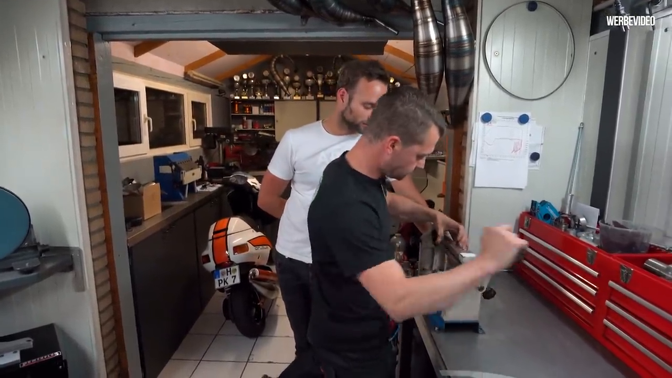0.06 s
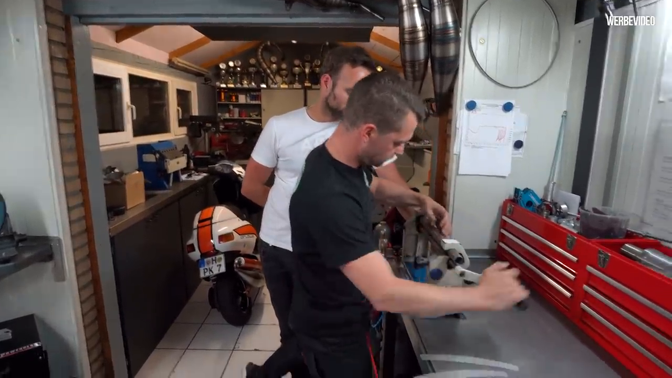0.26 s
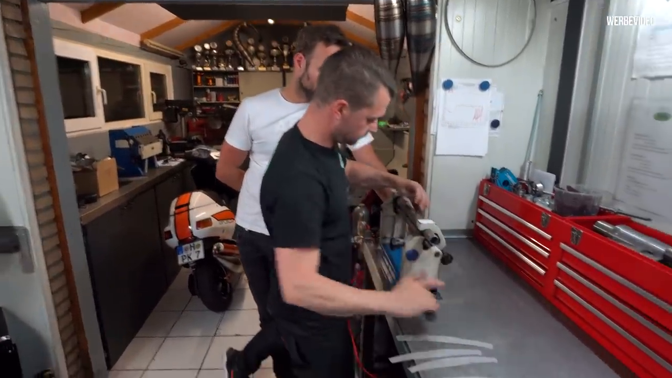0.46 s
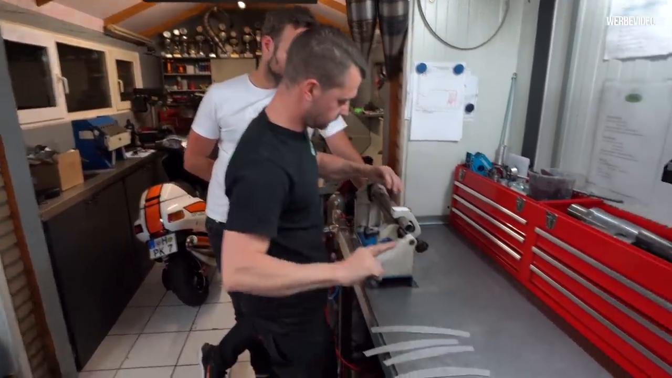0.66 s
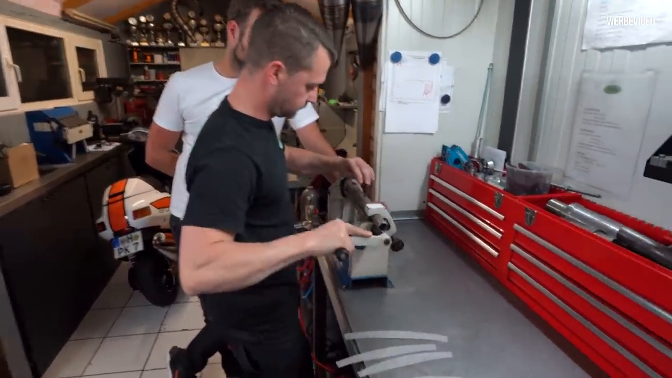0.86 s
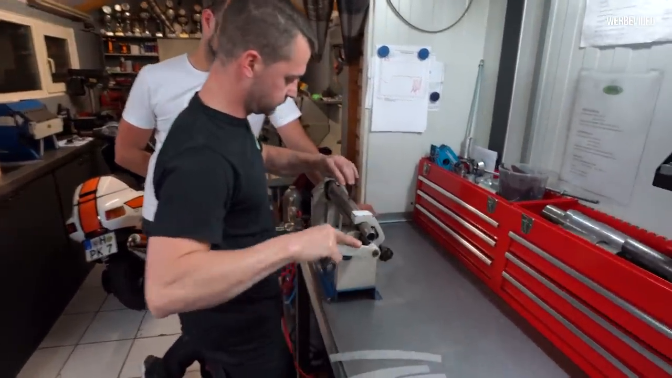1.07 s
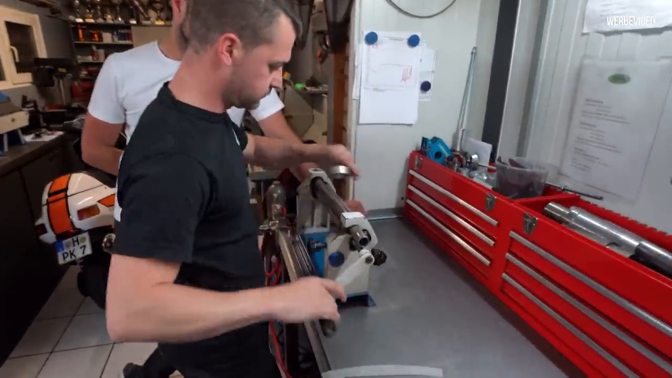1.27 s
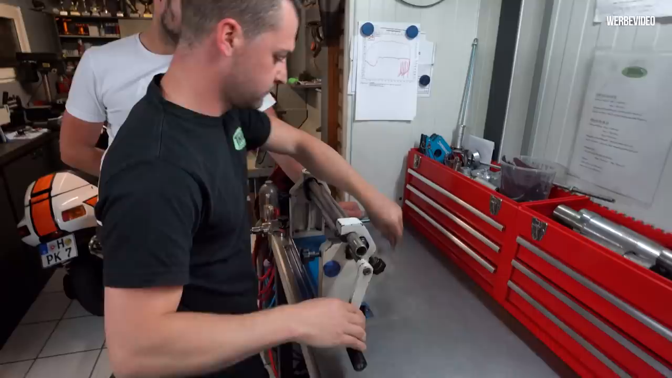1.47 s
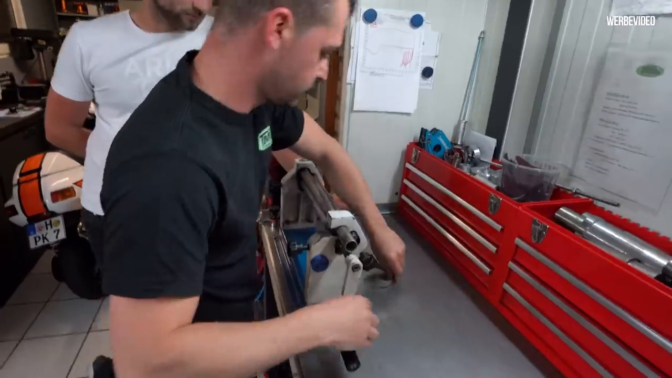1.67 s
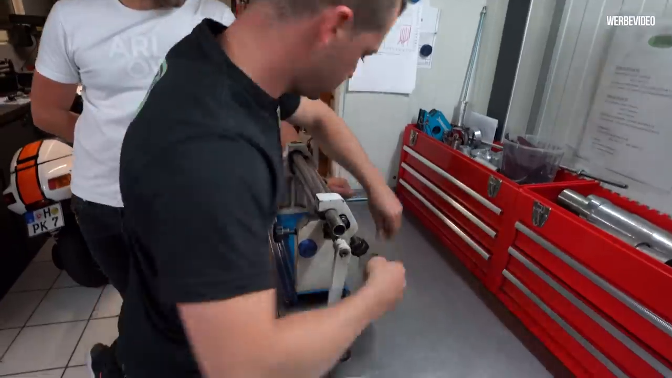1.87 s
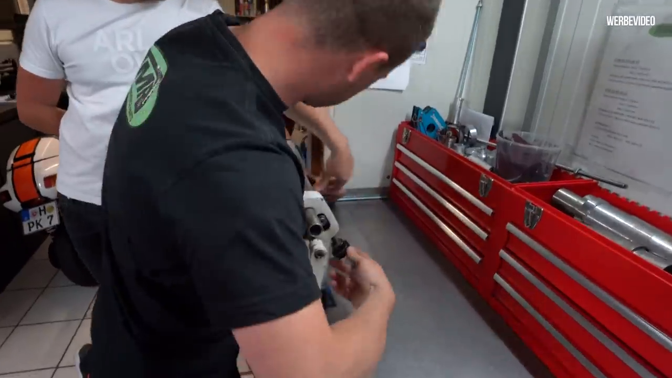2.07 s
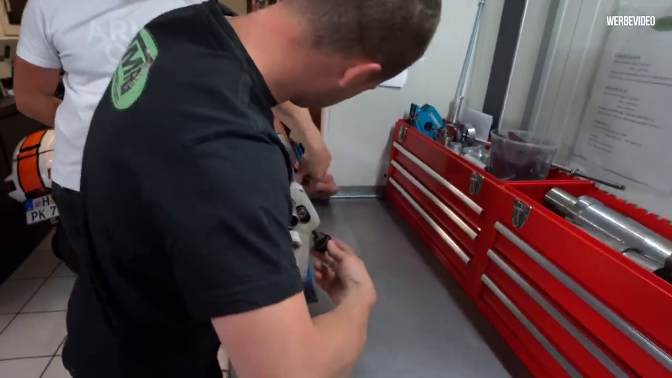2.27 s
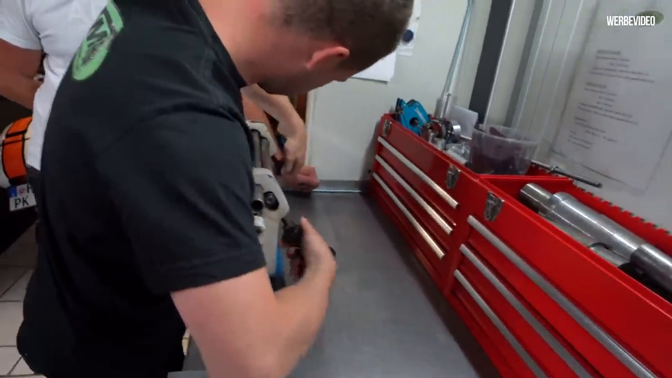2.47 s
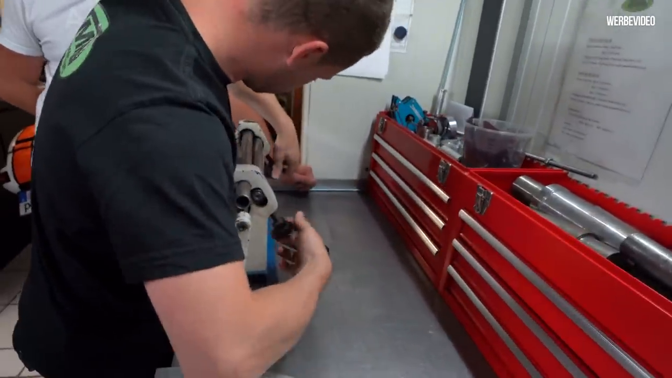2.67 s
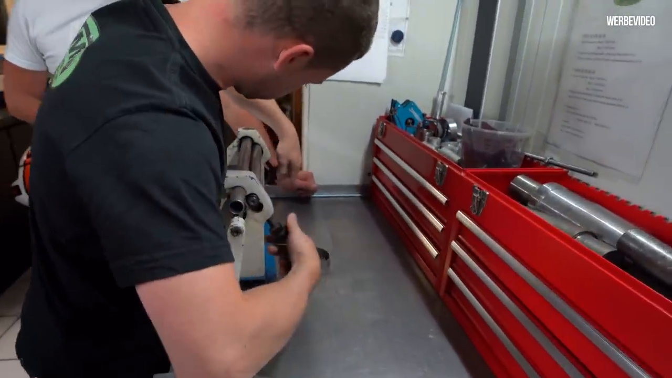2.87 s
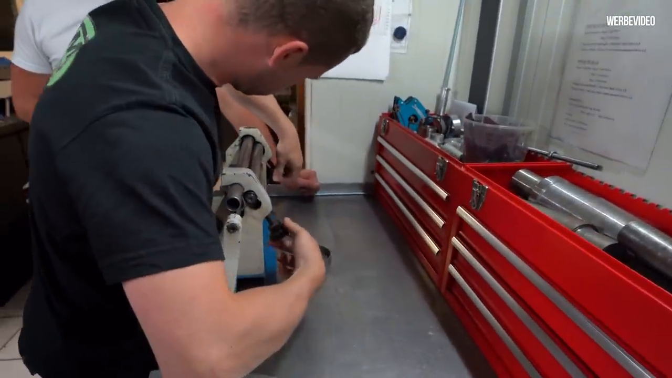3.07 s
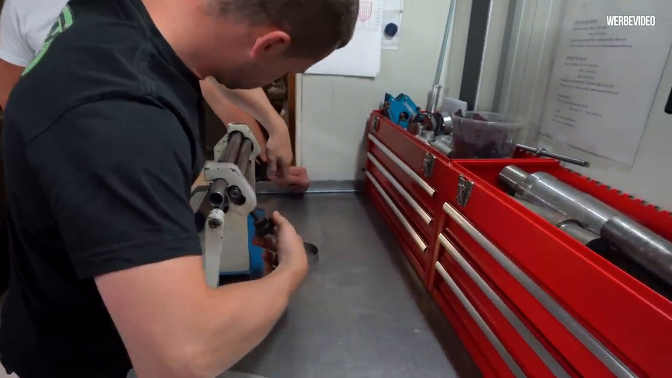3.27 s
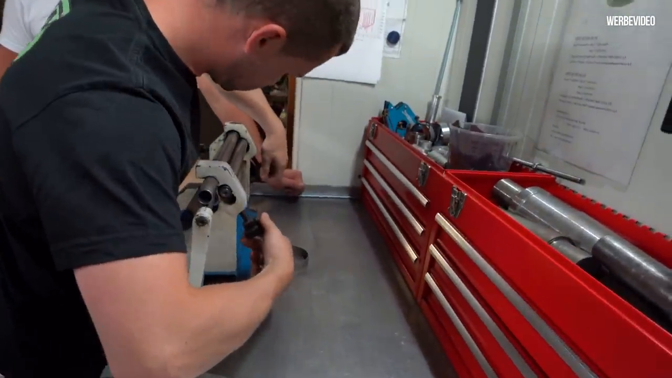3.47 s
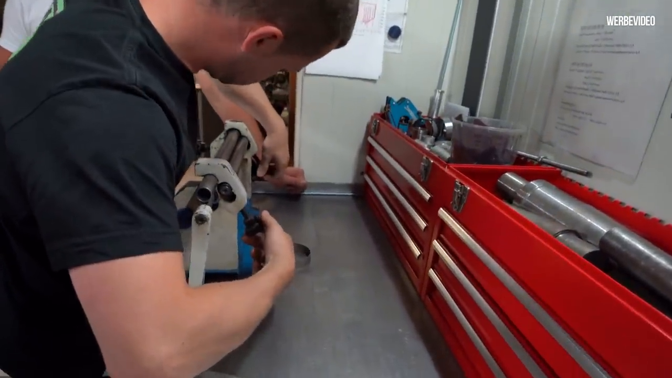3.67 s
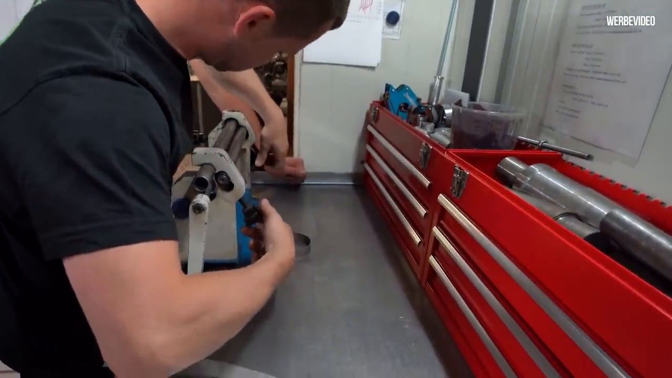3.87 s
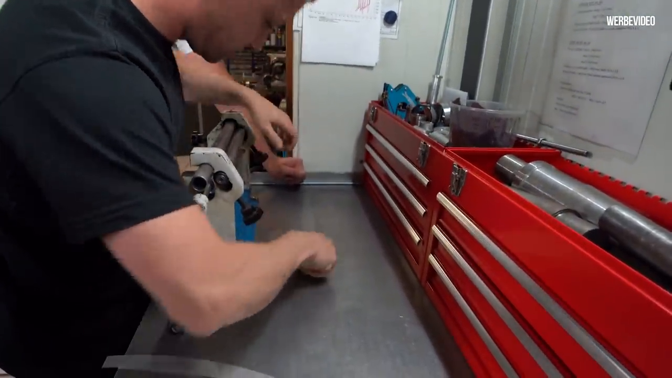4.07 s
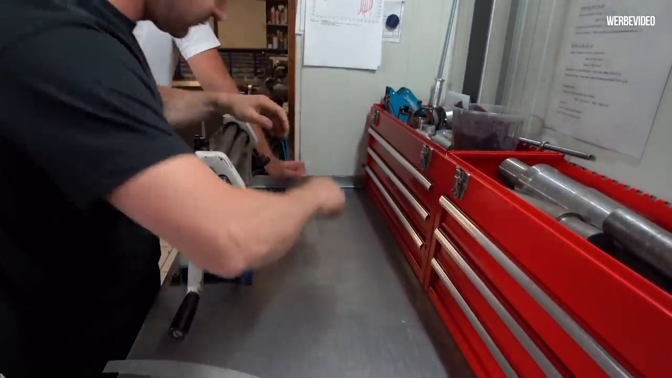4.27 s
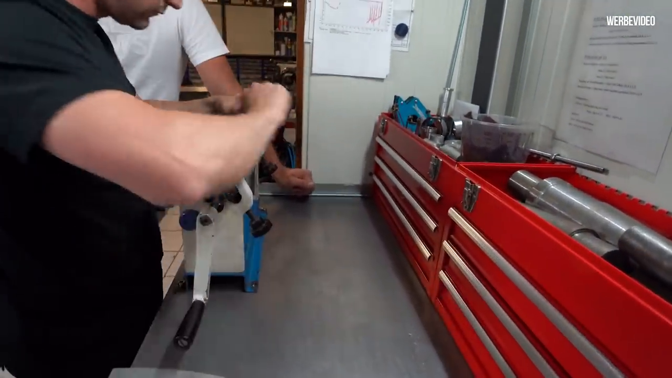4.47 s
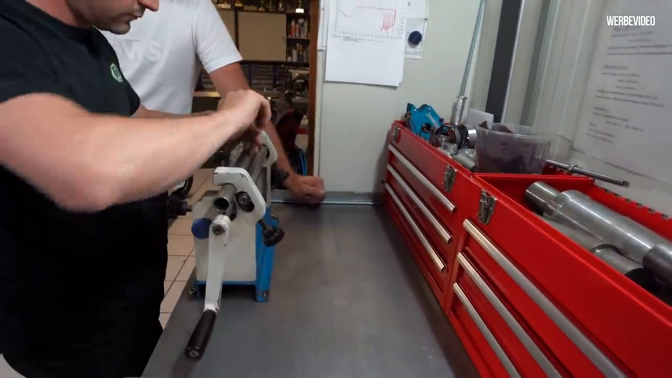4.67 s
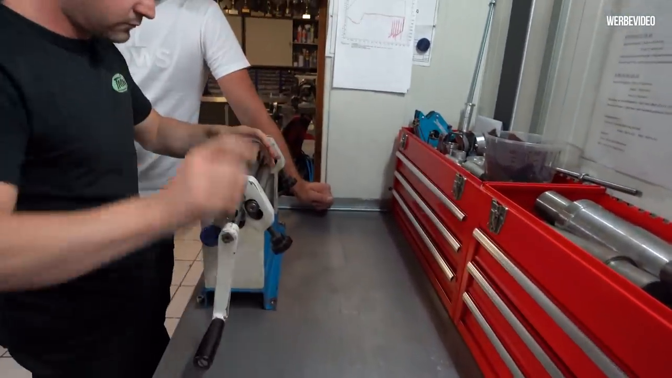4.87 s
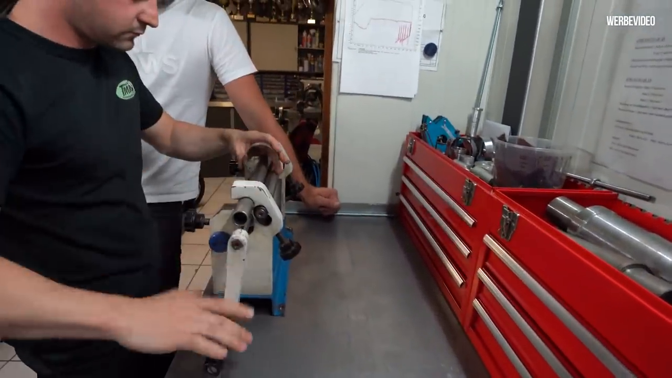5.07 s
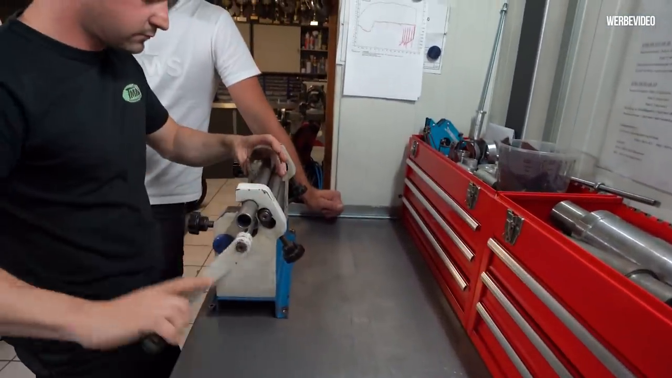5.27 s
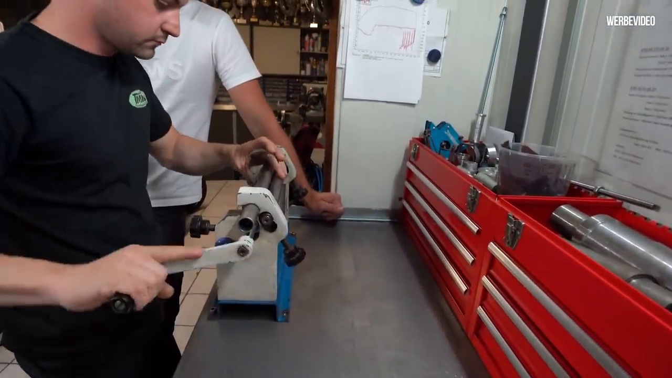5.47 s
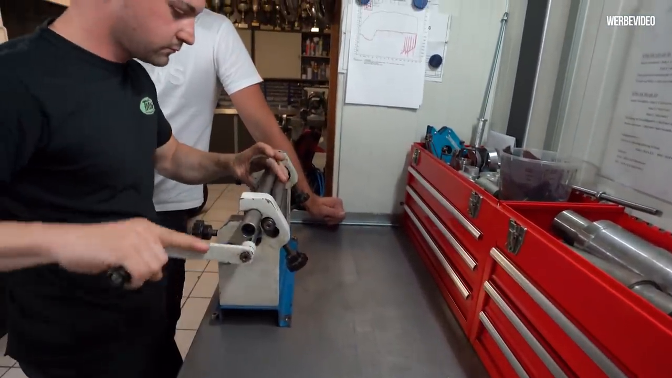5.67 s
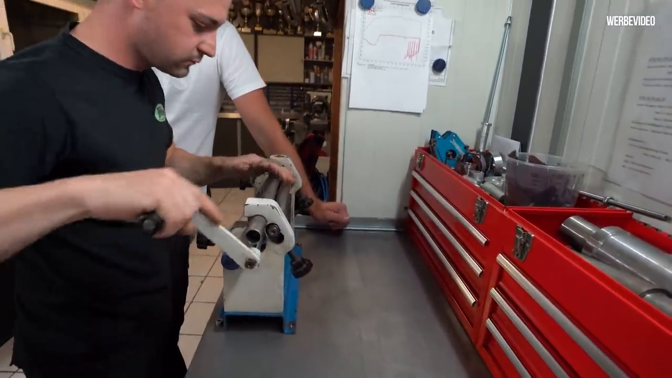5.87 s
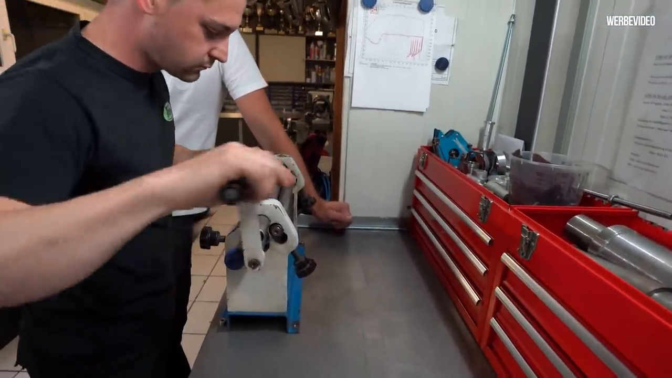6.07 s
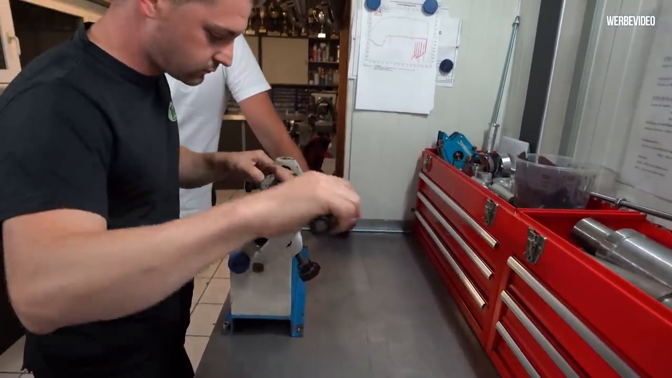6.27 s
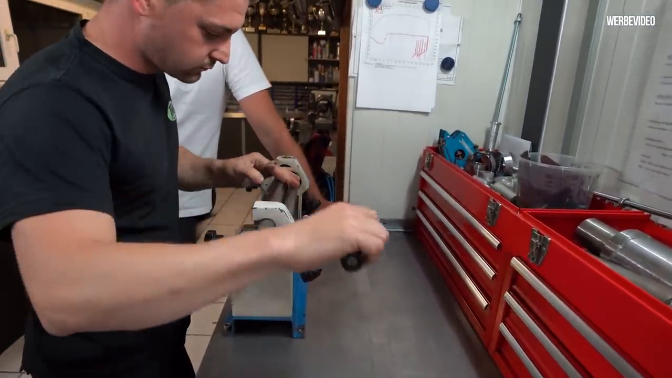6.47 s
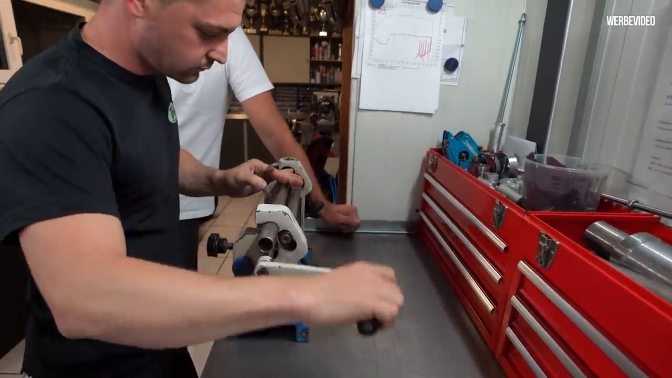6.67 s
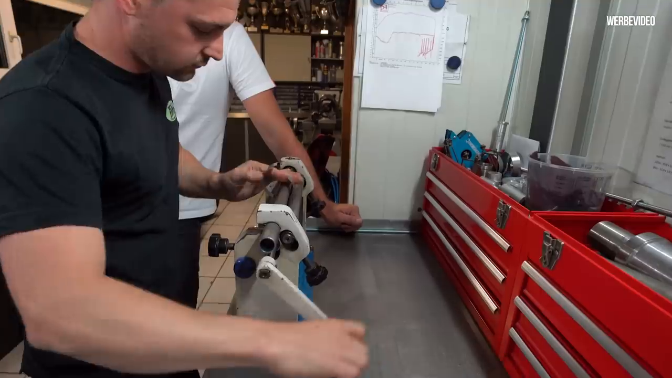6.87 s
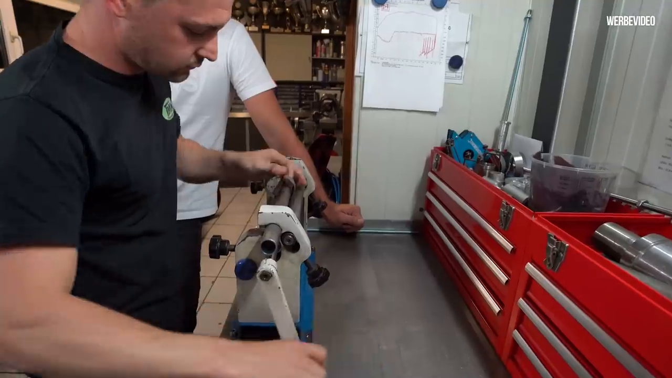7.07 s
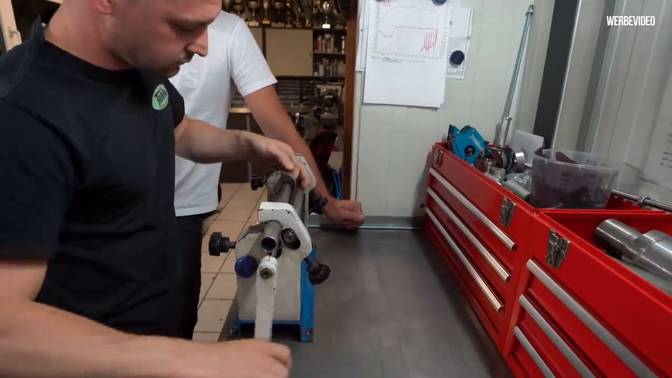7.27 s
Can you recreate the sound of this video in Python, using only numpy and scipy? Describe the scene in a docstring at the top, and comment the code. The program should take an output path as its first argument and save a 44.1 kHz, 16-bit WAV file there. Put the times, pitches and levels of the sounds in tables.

```python
"""A hand-cranked slip roll on a steel bench in a small workshop. The crank spins, gear teeth clatter and
shake the frame, the rolls grumble, then the crank clanks to a stop. A loose steel part scrapes and
rings; things are slid and knocked on the bench. The crank is taken up again with a few clanks and the
gears knock slowly, tooth by tooth. Small parts tick and jingle; dry bearings squeak faintly."""
import sys
import numpy as np
from scipy import signal
from scipy.fft import rfft, irfft, next_fast_len
from scipy.io import wavfile

SR = 44100
rng = np.random.default_rng(int(sys.argv[2]) if len(sys.argv) > 2 else 0)


def materialize(psi):
    """Save the field psi as 16-bit PCM at rate SR to the path in sys.argv[1].

    A 1-D psi becomes a single channel; in a 2-D psi each row is a channel.
    """
    bounded = np.clip(np.atleast_2d(psi).T, -1, 1)
    quanta = np.round(bounded * 32767).astype(np.int16)
    wavfile.write(sys.argv[1], SR, quanta)


N = 322944
SCENE_S = np.arange(N) / SR
EVENT_S = np.arange(SR // 2) / SR  # time within one blow or stroke


def amp(db):
    """Decibels to gain."""
    return 10 ** (np.asarray(db) / 20)


def unit(x):
    """Scale to rms 1."""
    return x / np.sqrt(np.mean(x ** 2) + 1e-20)


def along(points, hz):
    """Interpolate (Hz, value) points on a log axis."""
    point_hz, values = np.transpose(points)
    return np.interp(np.log(hz + 1), np.log(point_hz + 1), values)


def filtered(x, response):
    """Apply a gain given as a function of Hz."""
    size = next_fast_len(len(x) + 4096)
    return irfft(rfft(x, size) * response(np.fft.rfftfreq(size, 1 / SR)), size)[:len(x)]


def noise(spectrum, size, tilt_db=0):
    """Coloured noise of rms 1, tilted by tilt_db per octave."""
    white = rng.standard_normal(size)
    return unit(filtered(white, lambda hz: amp(along(spectrum, hz) + tilt_db * np.log2(hz + 1))))


def add(track, start_s, sound):
    """Mix a sound into the track."""
    start = max(round(start_s * SR), 0)
    track[start:start + len(sound)] += sound[:max(N - start, 0)]


def rise(attack_s):
    """Soft onset."""
    return 1 - np.exp(-(EVENT_S / attack_s) ** 2)


def decay(t60_s, hold_s=0):
    """Hold, then fall 60 dB per t60_s."""
    return amp(-60 * np.maximum(EVENT_S - hold_s, 0) / t60_s)


def burst(spectrum, band_t60s, attack_s, tilt_db=0):
    """Dense modes: noise with a separate decay per band."""
    source = noise(spectrum, len(EVENT_S), tilt_db)
    out = np.zeros(len(EVENT_S))
    centres_hz, t60s = np.transpose(band_t60s)
    for share, t60_s in zip(np.eye(len(t60s)), t60s):
        out += filtered(source, lambda hz: along(np.c_[centres_hz, share], hz)) * decay(t60_s)
    return out * rise(attack_s)


def ring(modes, attack_s, spread_db, favour_hz=1000, favour_db=0, width_oct=1, tilt_db=0):
    """Separate modes; the strike point favours those near favour_hz."""
    hz, db, t60_s = np.transpose(modes)[:, :, None]
    away_oct = np.log2(hz / favour_hz)
    boost_db = favour_db * np.exp(-(away_oct / width_oct) ** 2) + tilt_db * away_oct
    gain = amp(db + boost_db + spread_db * rng.standard_normal(hz.shape))
    phase = 2 * np.pi * (hz * EVENT_S + rng.random(hz.shape))
    partials = gain * decay(t60_s) * np.sin(phase)
    return partials.sum(axis=0) / np.linalg.norm(gain) * rise(attack_s)


# Spells of turning. Each row: start in seconds, end in seconds, level in dB.
TURNS = [(0, 0.497, -39), (0.605, 0.772, -42.5), (1.125, 1.456, -44.5), (5.764, 6.262, -46),
         (6.558, 6.964, -45.5)]
# Hand rustle curve. Each row: time in seconds, level in dB.
HAND_RUSTLE = [(0, -53.5), (3.55, -52), (3.95, -65.5), (4.8, -66.5), (5.2, -43), (5.5, -59.5), (7.32, -52)]
# Machine on the bench. Each row: frequency in Hz, relative level in dB.
GRUMBLE_SPECTRUM = [(29, -59.5), (50, -26), (103, 2), (238, -3), (365, -11), (472, -7.5), (532, -15),
                    (1000, -20), (1190, -21), (3000, -27.5), (3900, -46), (6600, -120)]


def grumble(attack_s=0.023, release_s=0.054):
    """The machine grumbles on the bench while its rolls turn, and faintly under the hands."""
    level = amp(np.interp(SCENE_S, *np.transpose(HAND_RUSTLE)))
    for start_s, end_s, db in TURNS:
        gate = np.interp(SCENE_S, [start_s - attack_s, start_s, end_s, end_s + release_s], [0, 1, 1, 0])
        level = np.hypot(level, amp(db) * gate)
    return level * noise(GRUMBLE_SPECTRUM, N)


# Free spin curve. Each row: time in seconds, teeth per second, strength in dB.
CRANK_SPIN = [(.017, 19.2, -36.5), (.14, 25.9, -31), (0.269, 17.5, -32), (.38, 23.4, -29.5),
              (.45, 19.5, -24.5), (.5, 17.2, -28.5), (.55, 14.9, -38.5), (.6, 12.5, -41),
              (0.749, 21.8, -47)]


def spinning_teeth():
    """Start in seconds and strength in dB of each tooth passing as the crank spins."""
    times_s, teeth_per_s, db = np.transpose(CRANK_SPIN)
    span_s = SCENE_S[(SCENE_S >= times_s[0]) & (SCENE_S < times_s[-1])]
    teeth_passed = np.cumsum(np.interp(span_s, times_s, teeth_per_s)) / SR
    starts_s = np.interp(np.arange(np.ceil(teeth_passed[-1])), teeth_passed, span_s)
    return list(zip(starts_s, np.interp(starts_s, times_s, db)))


# Single teeth under slow cranking. Each row: start in seconds, strength in dB.
SLOW_TEETH = [(.872, -35), (1.0988, -34.5), (1.192, -31), (1.2656, -33.5), (1.3522, -37), (1.4556, -43.5),
              (5.6876, -41), (5.7979, -31), (5.915, -35.5), (6.0192, -42), (6.114, -26.5), (6.2061, -21),
              (6.3094, -28.5), (6.5025, -30.5), (6.644, -23.5), (6.7478, -24.5), (6.8494, -24.5),
              (6.964, -30), (7.1326, -38.5)]
# Slack teeth click, loaded teeth thump. Each row: time in seconds, click gain in dB, thump gain in dB.
MESH = [(0, 4, 0.5), (.39, 2, 0), (.45, -4.5, -7.5), (.62, 8.5, 3), (0.869, -12.5, -13), (1.19, -7, -11),
        (1.46, 8.5, -3), (5.699, -6, 14.5), (6.02, 3.5, 12.5), (6.11, -6, 1), (6.55, -9.5, -3),
        (7.13, -4, -1.5)]
# Tooth click. Each row: frequency in Hz, relative level in dB.
CLICK_SPECTRUM = [(290, -31.5), (500, -7.5), (670, -12.5), (1080, -14), (1200, -9), (1590, -11),
                  (2070, -15), (4090, -23), (5930, -32), (12000, -47.5), (15600, -84.5), (22000, -120)]
# Click decay. Each row: band in Hz, t60 in seconds.
CLICK_T60S = [(500, 0.18), (1800, 0.097), (6000, 0.044)]
# Wheel, frame and bench modes. Each row: frequency in Hz, relative level in dB, t60 in seconds.
WHEEL_MODES = [(1180, 0, .22), (1335, -5, .16), (1635, -3, .2), (2070, -7, .4)]
FRAME_MODES = [(290, -1, .15), (340, -3, .14), (378, 2, .18), (398, -1, .17), (440, -4, .12),
               (495, -2, .14), (550, -8, .1), (620, -9, .1), (780, -8, .12)]
BENCH_MODES = [(101.45, -12, 0.7), (133.1, 1, 0.24), (155.3, -8.5, 0.4), (196.3, 2.5, 0.19),
               (218.9, 0, 0.15), (256.7, -9.5, 0.29), (284.9, 0, 0.19), (327, -4.5, 0.089)]


def gears(unloaded_hz=385, sag_oct_per_db=1.9):
    """Each tooth clicks at once; the heavy frame and the bench swing up a little later."""
    out = np.zeros(N)
    mesh_s, clicks_db, thumps_db = np.transpose(MESH)
    for start_s, db in SLOW_TEETH + spinning_teeth():
        click_db = np.interp(start_s, mesh_s, clicks_db)
        thump_db = np.interp(start_s, mesh_s, thumps_db)
        tilt_db = -0.83 + 0.3 * click_db  # slack teeth click brighter
        frame_hz = unloaded_hz * 2 ** (-sag_oct_per_db * max(thump_db, 0))  # sinks under load
        click = burst(CLICK_SPECTRUM, CLICK_T60S, attack_s=0.0015, tilt_db=tilt_db)
        wheels = ring(WHEEL_MODES, attack_s=0.002, spread_db=3)
        frame = ring(FRAME_MODES, attack_s=0.011, spread_db=2.5,
                     favour_hz=frame_hz, favour_db=6, width_oct=0.25)
        bench = ring(BENCH_MODES, attack_s=0.013, spread_db=4)
        contact = amp(click_db - 3.5) * click + amp(click_db - 11) * wheels
        add(out, start_s, amp(db) * (contact + amp(8) * frame + amp(thump_db + 4.5) * bench))
    return out


# Blows on the stops. Each row: start in seconds, blow in dB, ring in dB, favoured roll pitch in Hz.
CLANKS = [(.108, -23.5, -34, 1335), (.896, -24.5, -50, 385), (.905, -5, -21, 2580), (.913, -13, -26, 1335),
          (.955, -21, -29.5, 2620), (1, -21, -44, 2660), (5.124, -32, -45, 1742), (5.174, -20, -40, 3430),
          (5.182, -24.5, -34, 2082), (5.215, -18.5, -21.5, 1650), (5.401, -27.5, -41, 3430),
          (5.428, -31, -47, 732)]
# Steel crash. Each row: frequency in Hz, relative level in dB.
CRASH_SPECTRUM = [(88, -28), (150, -6.5), (213, -2), (993, -6), (1360, -2), (1520, -12.5), (1680, -2),
                  (2340, -7), (2580, -5), (2900, -8), (5310, -12.5), (6700, -25.5), (15800, -50)]
# Crash decay. Each row: band in Hz, t60 in seconds.
CRASH_T60S = [(300, 0.24), (2500, 0.07), (10000, 0.13)]
# Roll modes. Each row: frequency in Hz, relative level in dB, t60 in seconds.
ROLL_MODES = [(385, 0, .3), (732, -5, .25), (1205, -3, .22), (1335, -3, .22), (1650, 1, .18),
              (1742, -4, .22), (2082, -5, .27), (2562, -6, .28), (2651, -8, .24), (3430, -7, .16),
              (3895, -9, .16), (5190, -9, .17), (5260, -9, .2)]


def clanks(grip_from_s=5.0):
    """Crank and rolls hit their stops: steel crashes, the rolls ring on, the bench booms."""
    out = np.zeros(N)
    for start_s, blow_db, ring_db, roll_hz in CLANKS:
        tilt_db = 3 + 0.1246 * blow_db  # softer blows are duller
        crash = burst(CRASH_SPECTRUM, CRASH_T60S, attack_s=0.0013, tilt_db=tilt_db)
        rolls = ring(ROLL_MODES, attack_s=0.002, spread_db=1.5,
                     favour_hz=roll_hz, favour_db=10, width_oct=0.07)
        if start_s > grip_from_s:
            rolls *= decay(t60_s=0.266)  # a resting hand shortens the ring
        boom = amp(-14.5 + 0.63 * blow_db) * ring(BENCH_MODES, attack_s=0.008, spread_db=1.5)
        add(out, start_s, amp(blow_db - 5) * crash + amp(ring_db + 4) * rolls + boom)
    return out


# Flurries. Each row: start in seconds, end in seconds, contact level in dB.
JINGLES = [(1.074, 1.16, -43.5), (4.931, 4.99, -50)]
# Small-part modes. Each row: frequency in Hz, relative level in dB, t60 in seconds.
JINGLE_MODES = [(4450, -4, .09), (6400, -8, .12), (9700, -7, .08), (11250, -1, .13), (13150, 0, .17),
                (14700, -6, .08), (15200, -3, .1)]
# Single contacts. Each row: start in seconds, level in dB.
TICKS = [(1.152, -33), (3.152, -38.5), (3.711, -33), (4.335, -38.5), (4.765, -40.5), (4.885, -30),
         (4.912, -36)]
# Contact noise. Each row: frequency in Hz, relative level in dB.
TICK_SPECTRUM = [(400, 3.5), (1000, -9), (1800, 0), (4500, -9), (7000, -14.5), (15000, -26.5)]
# Contact decay. Each row: band in Hz, t60 in seconds.
TICK_T60S = [(1000, 0.18), (8000, 0.039)]


def small_parts(contacts_per_s=160):
    """Loose parts jingle in flurries of scratchy contacts, each dying away on its own, or tick singly."""
    out = np.zeros(N)
    for start_s, end_s, db in JINGLES:
        for contact_s in np.arange(start_s, end_s, 1 / contacts_per_s):
            jingle = ring(JINGLE_MODES, attack_s=0.002, spread_db=4) * decay(t60_s=0.22)
            scratch = burst(TICK_SPECTRUM, TICK_T60S, attack_s=0.00071, tilt_db=6.5)
            jitter_s = (rng.random() - 0.5) / contacts_per_s
            add(out, contact_s + jitter_s, amp(db) * (jingle + amp(-1.5) * scratch))
    for start_s, db in TICKS:
        add(out, start_s, amp(db - 6.5) * burst(TICK_SPECTRUM, TICK_T60S, attack_s=0.00077))
    return out


# Bearing chirps. Each row: middle in seconds, half length in seconds, pitch in Hz, level in dB.
SQUEAKS = [(1.425, .01, 1900, -46), (2.655, .018, 2150, -46), (6.43, .014, 10400, -63),
           (6.83, .11, 2075, -56), (7.225, .009, 3300, -49), (7.225, .009, 11900, -59)]


def bearing_squeaks():
    """Dry bearings rub out faint tones of unsteady pitch."""
    out = np.zeros(N)
    for middle_s, half_s, hz, db in SQUEAKS:
        pitch_hz = hz * (1 + 0.007 * noise([(100, 0), (600, -60)], N))
        swell = np.exp(-((SCENE_S - middle_s) / half_s) ** 2 / 2)
        out += amp(db) * swell * np.sin(2 * np.pi * np.cumsum(pitch_hz) / SR)
    return out


# Soft slides. Each row: middle in seconds, half length in seconds, level in dB, tilt in dB per octave.
SWISHES = [(1.535, .03, -49.5, 1.5), (2.675, 0.0277, -37, -1), (2.729, .022, -43, -2.5),
           (4.119, 0.027, -43.5, 16), (4.4, 0.037, -54.5, 1)]
# Bench friction. Each row: frequency in Hz, relative level in dB.
SWISH_SPECTRUM = [(240, -71.5), (400, -44.5), (452, -19.5), (712, -7.5), (979, -13.5), (1060, -12),
                  (1910, -13), (2290, -7.5), (4330, -12), (8820, -36.5), (15000, -43)]


def swishes():
    """Things slide over the bench in soft swells of noise."""
    out = np.zeros(N)
    lead_s = EVENT_S.mean()
    for middle_s, half_s, db, tilt_db in SWISHES:
        swell = np.exp(-((EVENT_S - lead_s) / half_s) ** 2 / 2)
        add(out, middle_s - lead_s, amp(db) * swell * noise(SWISH_SPECTRUM, len(EVENT_S), tilt_db))
    return out


# Steel on steel. Each row: start in seconds, end in seconds, level in dB, tilt in dB per octave.
SCRAPES = [(1.652, 1.684, -28.5, 2.5), (1.67, 1.727, -29.5, -3), (1.789, 1.821, -21, 1),
           (1.825, 1.911, -24, -1.5), (4.181, 4.193, -34.5, -5)]
# Steel friction. Each row: frequency in Hz, relative level in dB.
SCRAPE_SPECTRUM = [(100, -30), (350, -12.5), (900, -9), (1400, -4.5), (2000, 2), (3200, -3), (5000, -5),
                   (7000, -9.5), (8600, -14.5), (15500, -19.5)]


def scrapes(catches_per_s=170, let_go_s=0.005):
    """The sliding steel part chatters as tiny burrs catch and let go."""
    out = np.zeros(N)
    for start_s, end_s, db, tilt_db in SCRAPES:
        stroke = rise(attack_s=0.004) * decay(t60_s=0.15, hold_s=end_s - start_s)
        catches = rng.random(len(EVENT_S)) < catches_per_s / SR
        drag = signal.lfilter([1], [1, -np.exp(-1 / (let_go_s * SR))], catches)
        chatter = unit(1 + 0.89 * drag)
        add(out, start_s, amp(db) * stroke * chatter * noise(SCRAPE_SPECTRUM, len(EVENT_S), tilt_db))
    return out


# Soft blows. Each row: start in seconds, level in dB, favoured pitch in Hz.
BUMPS = [(1.654, -26, 153), (1.82, -26, 193.4), (2.162, -27.5, 140.4), (2.449, -32.5, 199.7),
         (2.888, -36.5, 249), (3.463, -28, 243), (4.09, -26, 153.8), (4.342, -35, 129),
         (5.438, -14.5, 167.5), (5.766, -21.5, 184)]


def bumps():
    """Hands and machine bump the bench; the hand damps its low modes."""
    out = np.zeros(N)
    for start_s, db, hz in BUMPS:
        thump = ring(BENCH_MODES, attack_s=0.008, spread_db=2, favour_hz=hz, favour_db=13, width_oct=0.3)
        add(out, start_s, amp(db) * thump * decay(t60_s=1.5))
    return out


# Firm contacts. Each row: start in seconds, level in dB, tilt in dB per octave, favoured pitch in Hz.
CLINKS = [(1.655, -35, 2, 9393), (1.797, -12.5, 2.5, 2800), (1.814, -13, 3.5, 2864),
          (1.835, -18.5, 1.5, 9393), (1.863, -17, 0, 11000), (1.894, -19, 3.5, 3881),
          (1.925, -27, 1.5, 7814), (4.198, -37.5, -4, 2880)]
# Steel part modes. Each row: frequency in Hz, relative level in dB, t60 in seconds.
PART_MODES = [(1890, -8, .2), (2056, -4, .22), (2866, 2, .3), (3881, 0, .27), (5049, -1, .3),
              (6345, -10, .28), (7814, -1, .24), (9250, -10, .18), (9393, -3, .23), (10800, -9, .18),
              (11137, -2, .21), (12458, -10, .19), (13000, -3, .17), (14187, 2, .14), (15041, -10, .17)]


def clinks(free_ring_s=0.022):
    """The steel part rings at each contact until the next one, or the fingers, choke it."""
    out = np.zeros(N)
    gaps_s = np.diff([row[0] for row in CLINKS], append=N / SR)
    for (start_s, db, tilt_db, hz), gap_s in zip(CLINKS, gaps_s):
        choke = decay(t60_s=0.048, hold_s=min(gap_s, free_ring_s))
        part = ring(PART_MODES, attack_s=0.002, spread_db=1.5,
                    favour_hz=hz, favour_db=5, width_oct=0.1, tilt_db=tilt_db)
        add(out, start_s, amp(db + 3.5) * part * choke)
    return out


# Blows on the bench top. Each row: start in seconds, level in dB.
KNOCKS = [(2.7789, -14.5), (2.82, -32.5), (3.1127, -15.5)]
# Bench top modes. Each row: frequency in Hz, relative level in dB, t60 in seconds.
PLATE_MODES = [(385.7, 2, 0.12), (487.7, 2.5, 0.157), (604, -13, .08), (713, -3, 0.079), (975, -17, 0.15),
               (1207, -11.5, 0.13), (1310, -11.5, 0.14)]
# Impact thud. Each row: frequency in Hz, relative level in dB.
THUD_SPECTRUM = [(90, -8.5), (180, 1.5), (600, -2), (900, -12), (1500, -8), (1900, -16.5), (4300, -15),
                 (6500, -53), (12000, -73)]
# Thud decay. Each row: band in Hz, t60 in seconds.
THUD_T60S = [(300, 0.28), (1200, 0.21), (4500, 0.046)]


def knocks():
    """The struck bench top thuds and rings briefly as a plate."""
    out = np.zeros(N)
    for start_s, db in KNOCKS:
        plate = ring(PLATE_MODES, attack_s=0.003, spread_db=1.5)
        thud = burst(THUD_SPECTRUM, THUD_T60S, attack_s=0.0015)
        add(out, start_s, amp(db - 11) * thud + amp(db - 1) * plate)
    return out


# Workshop decay. Each row: band in Hz, t60 in seconds.
ROOM_T60S = [(150, 0.39), (1500, 0.23), (12000, 0.35)]


def room(x):
    """Diffuse reverberation of the workshop."""
    tail = burst([(60, -5), (300, -7), (4000, 0), (15000, -8.5)], ROOM_T60S, attack_s=0.013)
    return signal.fftconvolve(x, tail / np.linalg.norm(tail))[:N]


# Still air. Each row: frequency in Hz, relative level in dB.
AIR_SPECTRUM = [(18, -75), (30, -47.5), (120, -2.5), (279, -14), (335, -21.5), (698, -17), (755, -23),
                (1010, -11.5), (1270, -16), (2040, -21.5), (2590, -28), (4260, -24.5), (4610, -26.5),
                (6310, -33), (15800, -32)]


def scene():
    """Machine and bench in the room, over the grumble and still air."""
    work = gears() + clanks() + small_parts() + bearing_squeaks()
    work += swishes() + scrapes() + bumps() + clinks() + knocks()
    return (work + amp(-14.5) * room(work) + grumble() + amp(-53) * noise(AIR_SPECTRUM, N))[None]


def suppressor(x, threshold_db, depth_db, smoothing_s, corner_hz):
    """Turns the treble down while the whole sound is quiet."""
    pole = np.exp(-1 / (smoothing_s * SR))
    level_db = 10 * np.log10(signal.lfilter([1 - pole], [1, -pole], x ** 2) + 1e-12)
    shut = (1 - np.tanh((level_db - threshold_db) / 7)) / 2
    treble = filtered(x, lambda hz: hz ** 2 / (hz ** 2 + corner_hz ** 2))
    return x - treble * (1 - amp(-depth_db * shut))


def record(dry):
    """Gentle hiss suppression, bass cut and band limit."""
    low_hz, top_hz = 85, 15850
    x = suppressor(dry[0], threshold_db=-47, depth_db=10, smoothing_s=0.0042, corner_hz=600)
    bass_cut = signal.butter(4, low_hz, "highpass", fs=SR, output="sos")
    return filtered(signal.sosfilt(bass_cut, x), lambda hz: hz < top_hz)[None]


dry = scene()
out = record(dry)
materialize(out)
```